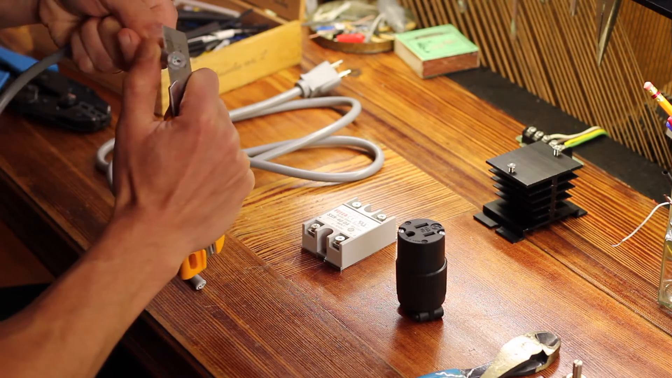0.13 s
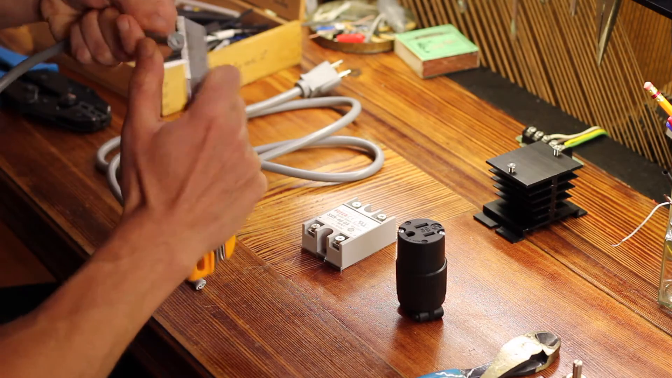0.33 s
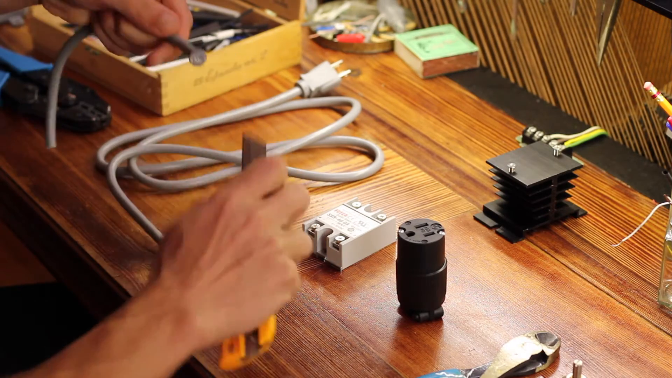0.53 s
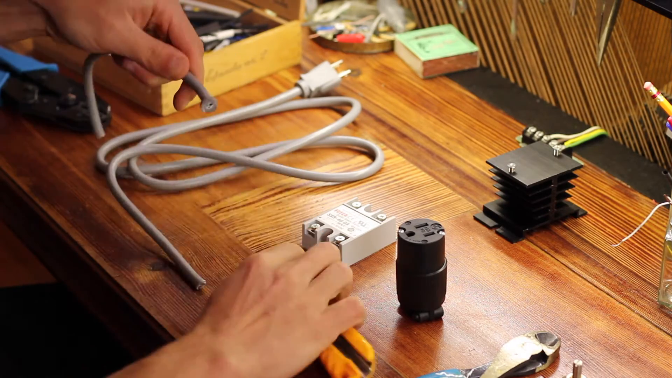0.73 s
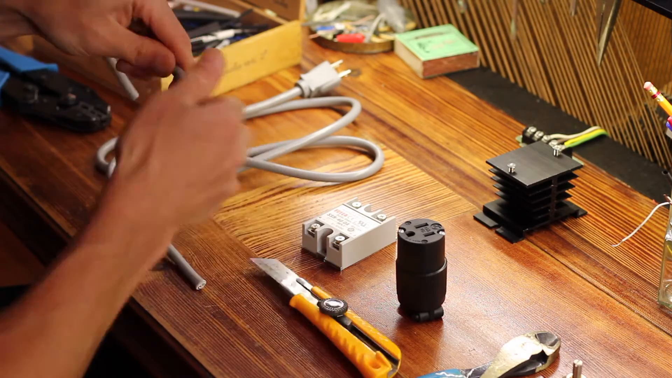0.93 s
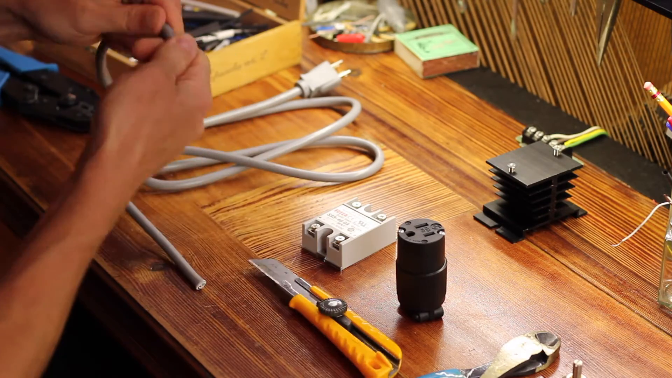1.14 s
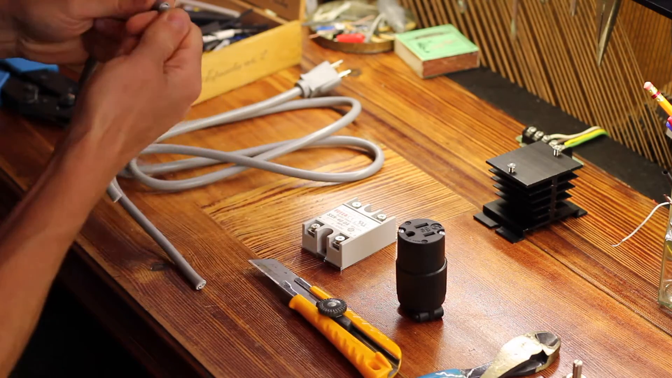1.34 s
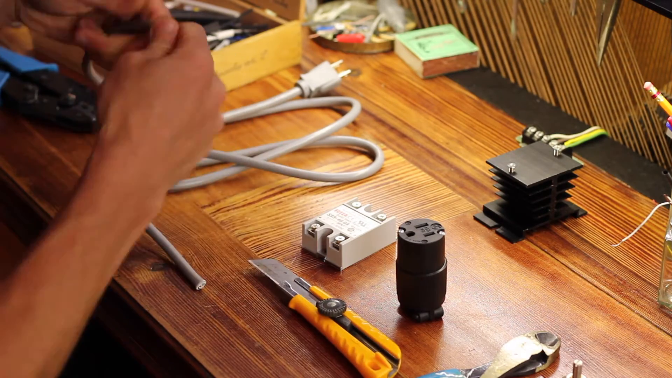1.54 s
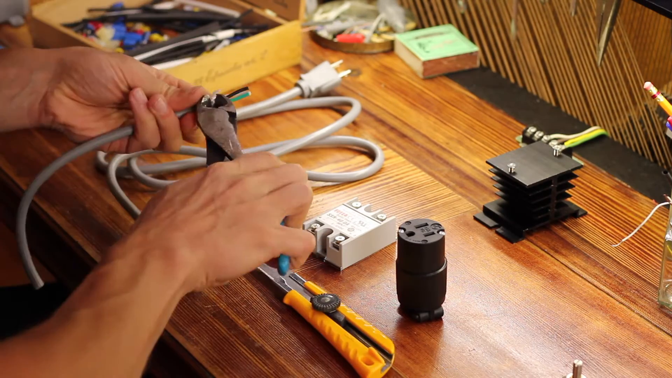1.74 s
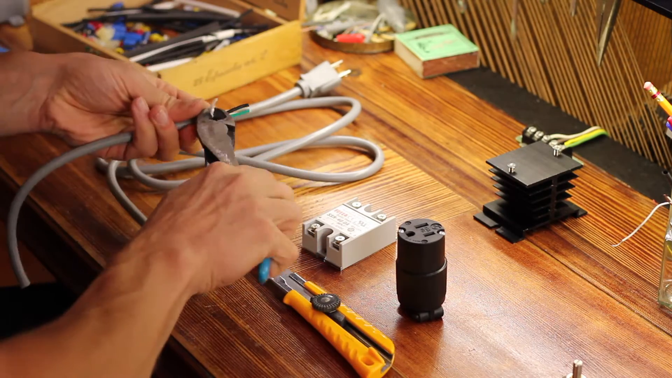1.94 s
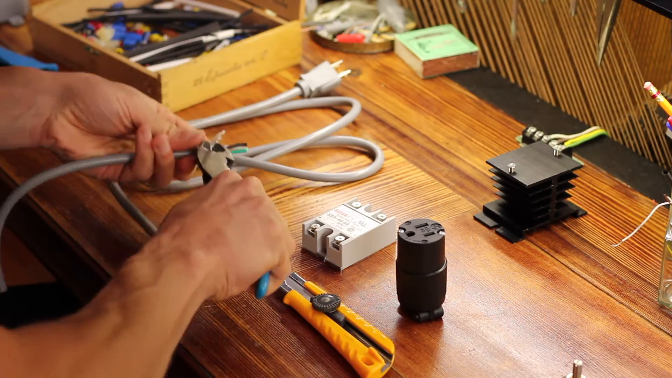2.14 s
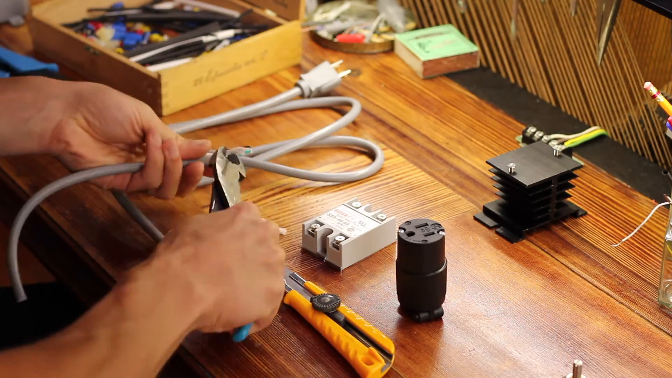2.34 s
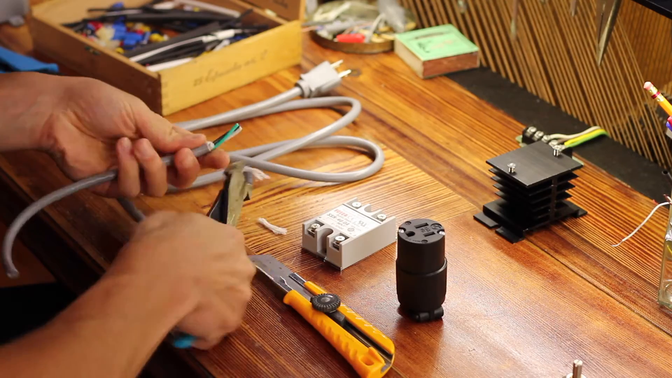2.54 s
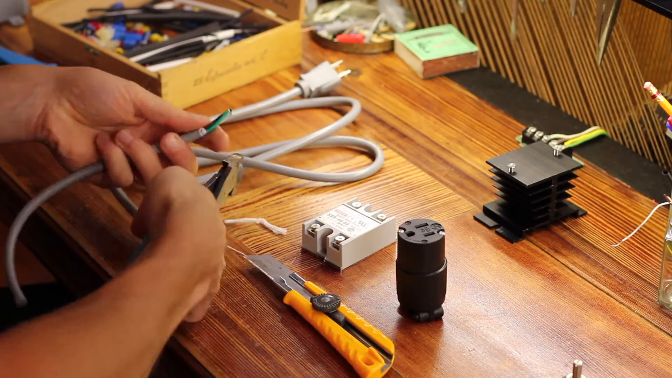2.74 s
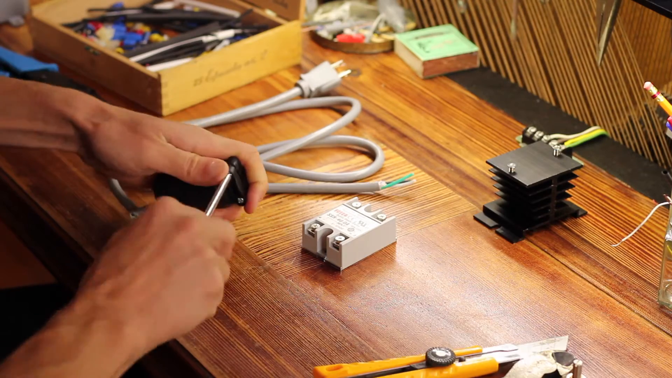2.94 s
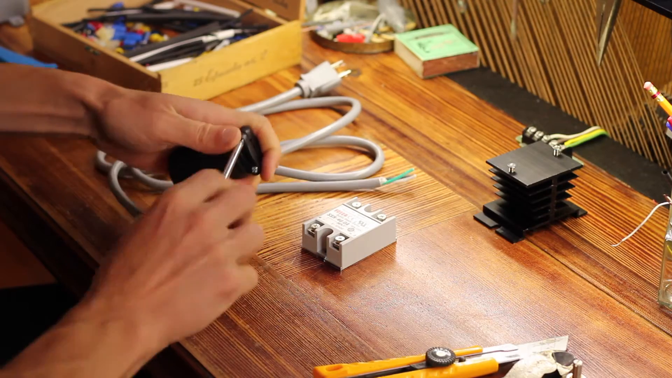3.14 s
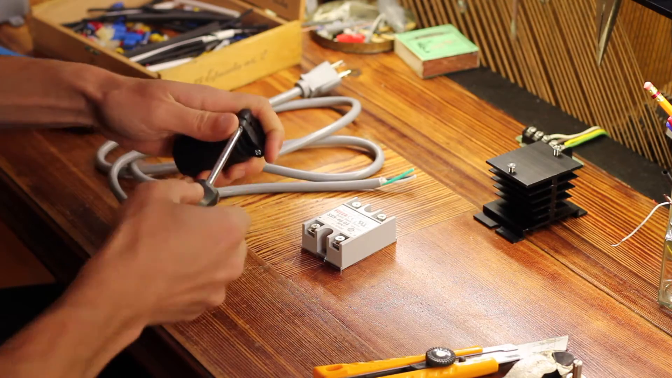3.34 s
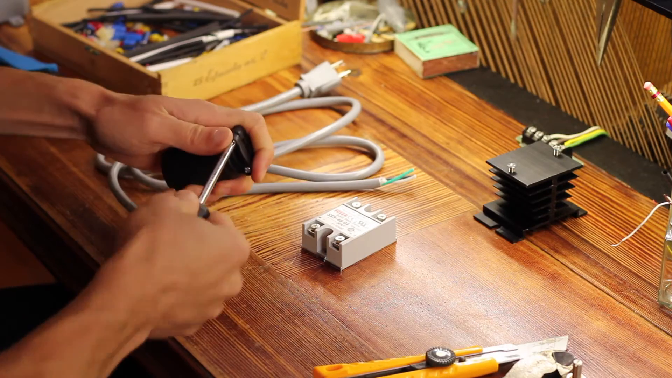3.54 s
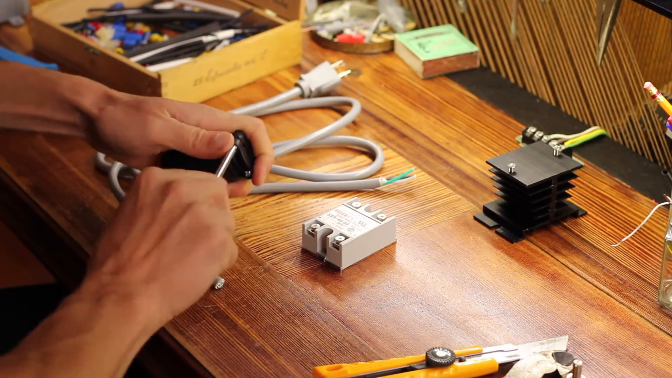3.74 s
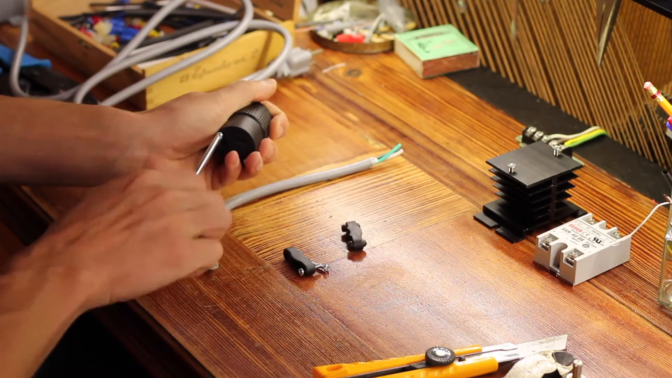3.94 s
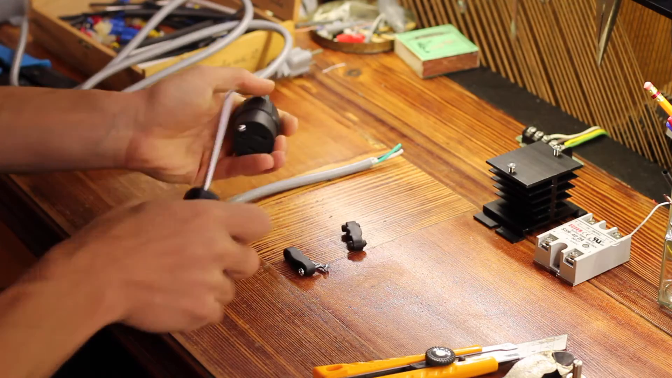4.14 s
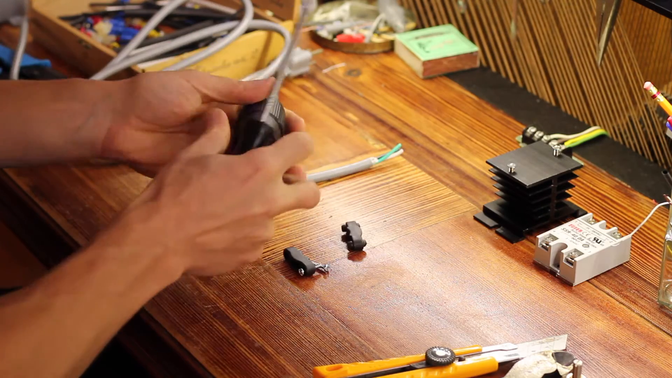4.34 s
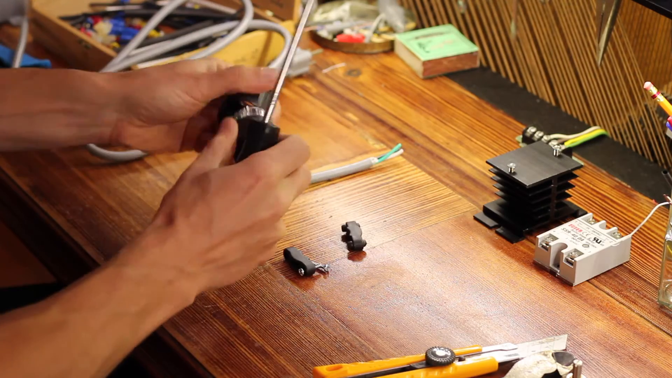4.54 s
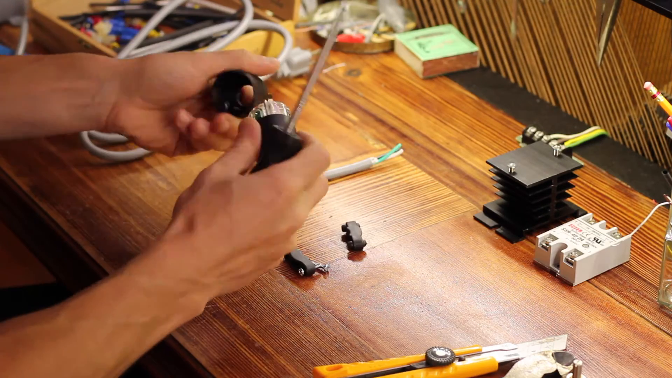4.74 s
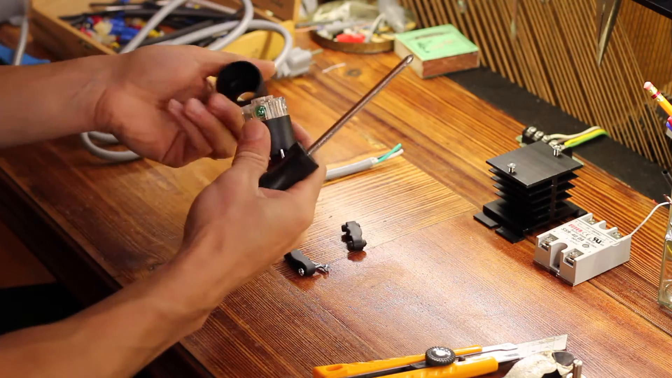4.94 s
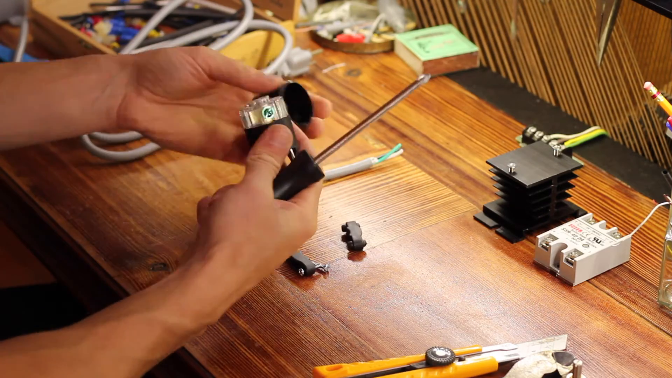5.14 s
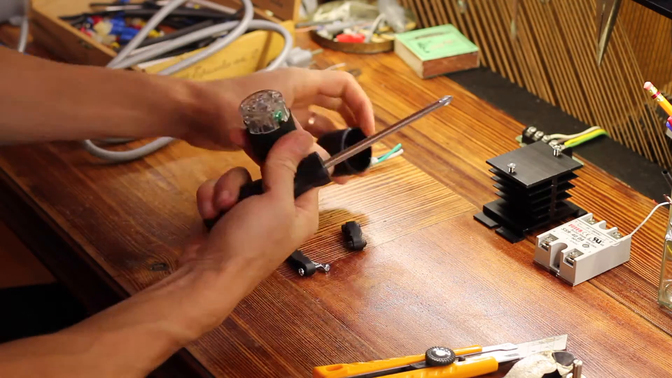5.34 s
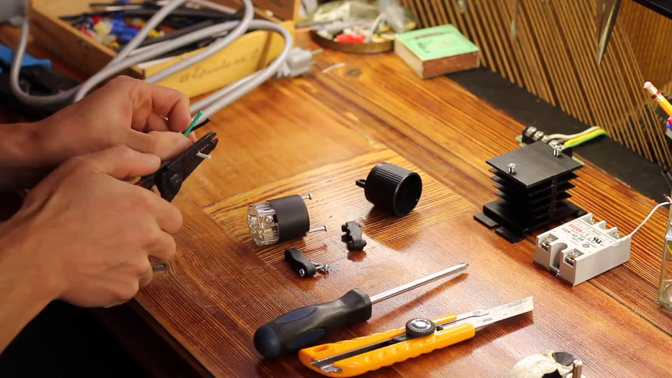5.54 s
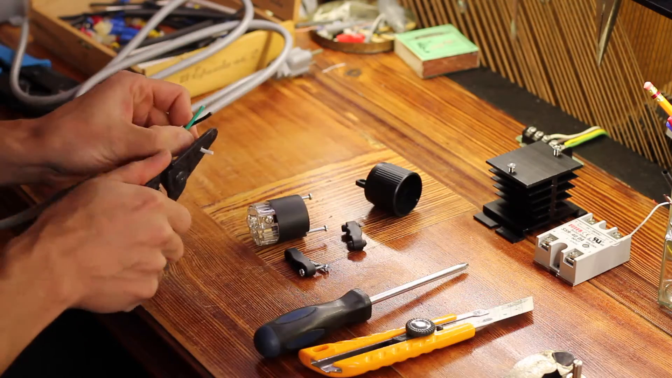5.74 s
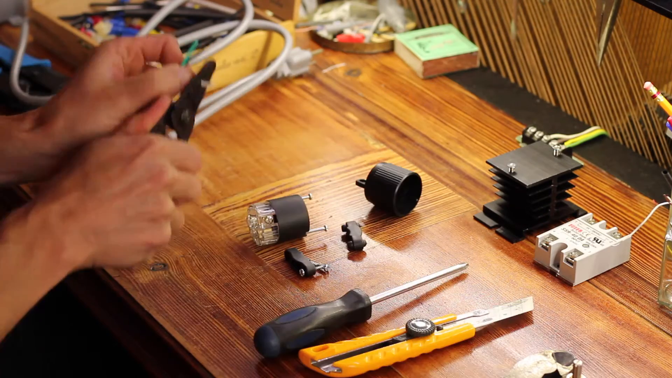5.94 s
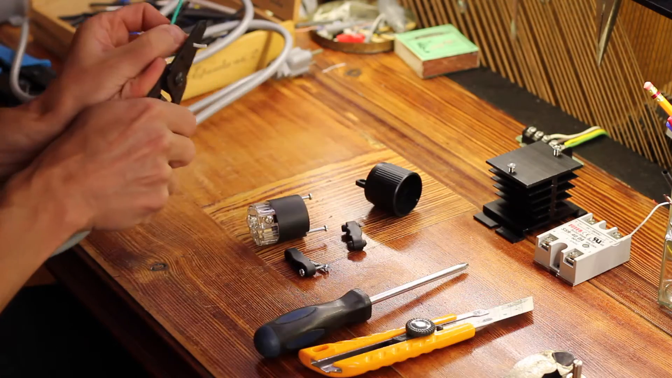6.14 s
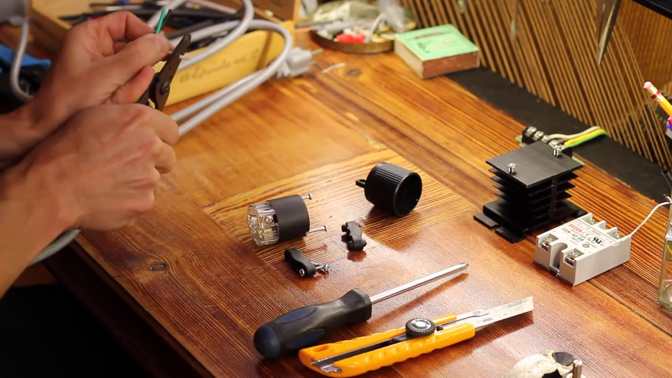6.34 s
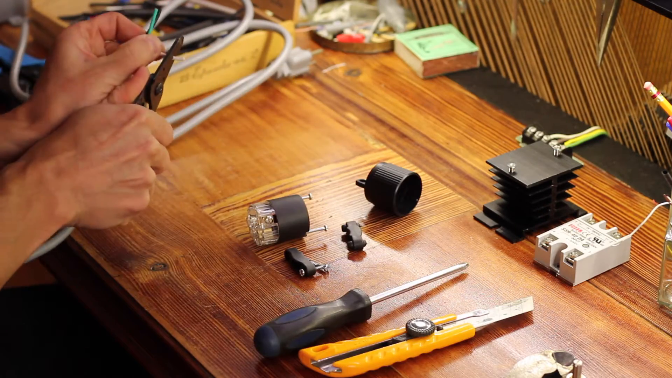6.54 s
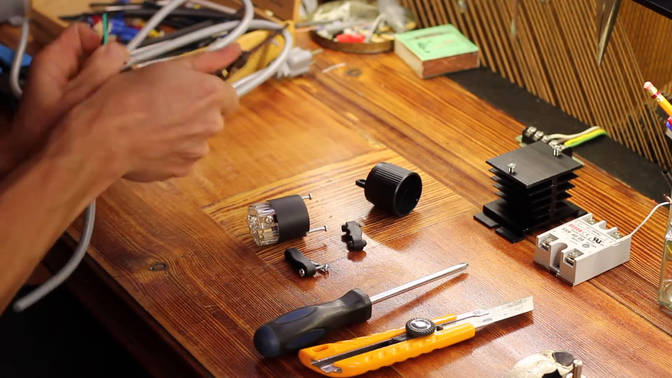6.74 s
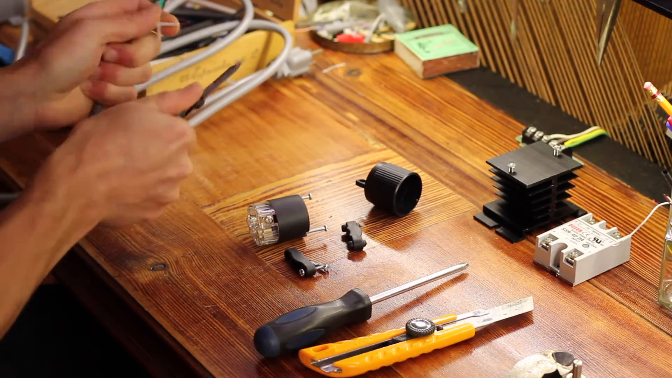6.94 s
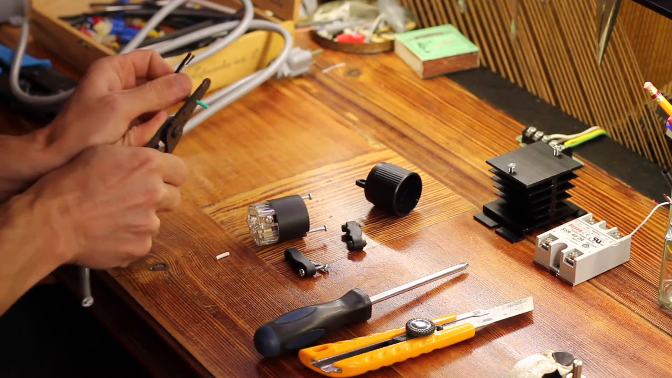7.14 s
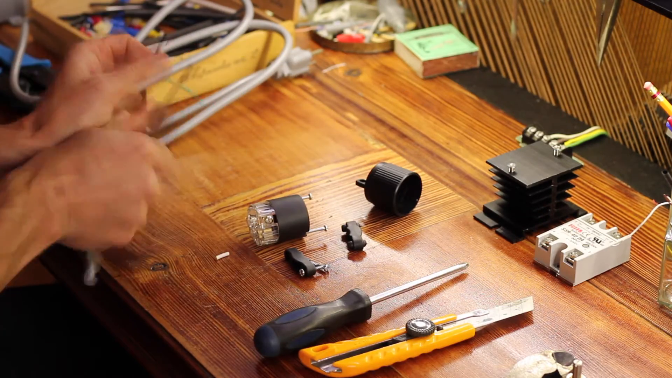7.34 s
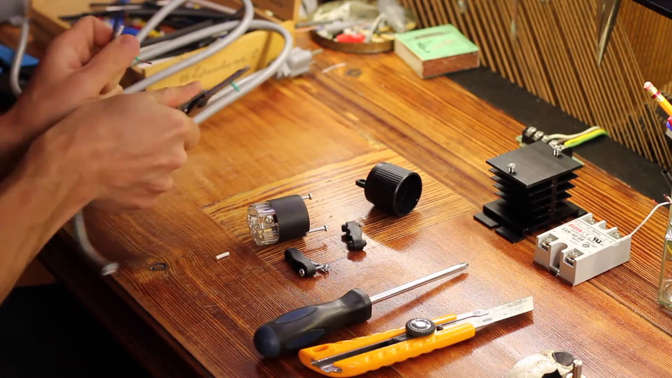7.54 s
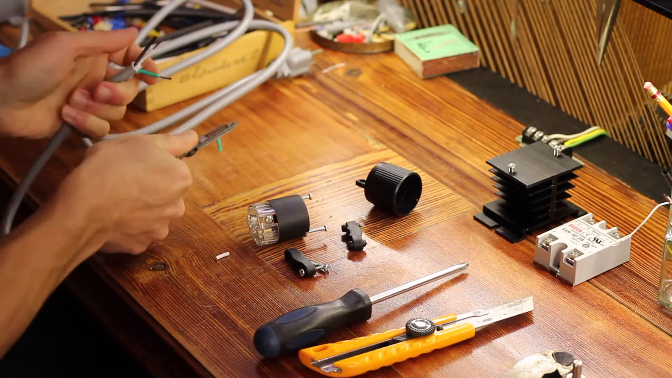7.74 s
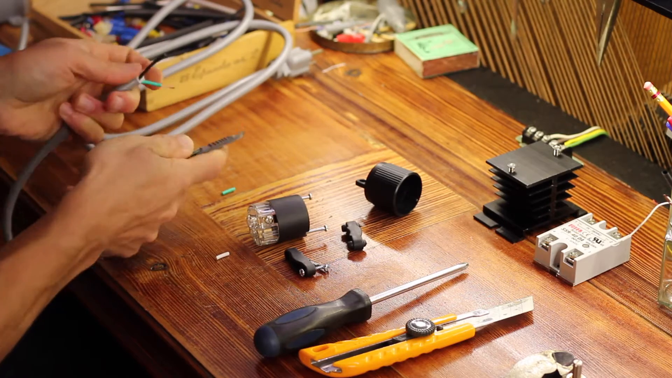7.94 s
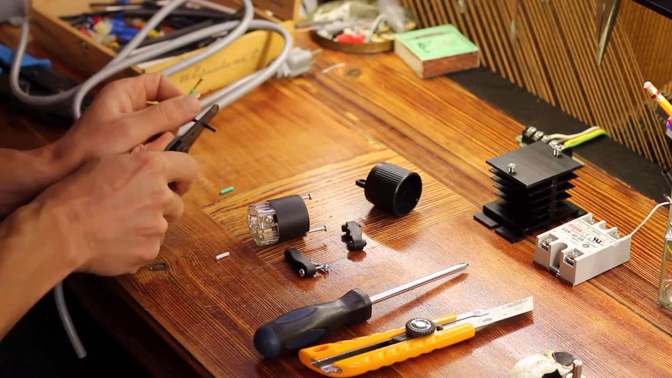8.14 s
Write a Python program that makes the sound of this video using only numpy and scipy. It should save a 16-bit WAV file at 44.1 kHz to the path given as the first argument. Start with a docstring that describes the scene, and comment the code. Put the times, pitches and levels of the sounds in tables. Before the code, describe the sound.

At a wooden bench, a knife clatters down, cutters crunch faintly through cable, plug parts knock and click, and wire strippers snap twice.

```python
"""A wooden bench in a small room: wiring work, heard close up and nearly mono.
A utility knife clicks and clatters down, side cutters crunch through a cable, a plug and tools are handled,
and wire strippers snap shut twice. Hits are noise bursts and short impulses through object resonances, with
diffuse room tails; the crunch is a dense run of random breaks. Shaped noise and thin tones lie under it all,
and the level dips briefly a few times."""
import sys
import numpy as np
from scipy import signal
from scipy.fft import rfft, irfft, next_fast_len
from scipy.io import wavfile
from scipy.ndimage import map_coordinates

SR = 44100
rng = np.random.default_rng(int(sys.argv[2]) if len(sys.argv) > 2 else 0)


def dump(signal):
    """Clip the signal to [-1, 1] and save it as 16-bit WAV at the path in sys.argv[1]."""
    limited = np.clip(np.atleast_2d(signal).T, -1, 1)
    pcm = np.round(limited * 32767).astype(np.int16)
    wavfile.write(sys.argv[1], SR, pcm)


N = 360738  # length in samples

# Knife clattering onto the bench: start_s, level_db, contact_s
KNIFE_KNOCKS = [(.742, -51.5, 0.033), (.748, -32.5, 0.13), (.764, -40.5, .06), (0.802, -31.5, 0.011),
                (.814, -26, 0.055), (0.823, -21.5, 0.099), (0.841, -21.5, .06), (.859, -23.5, 0.096),
                (0.879, -20, 0.092), (.905, -24, .06), (0.927, -23.5, 0.072), (0.946, -22, 0.063),
                (.988, -28, .06), (1.004, -25.5, 0.033), (1.062, -32.5, 0.048), (1.115, -39, .06)]
# Colour of the knocks on wood: freq_hz, gain_db
BENCH_COLOUR = [(40, -40.5), (80, -30), (175, -0.5), (280, -14), (410, 0.5), (520, 0), (700, 3.5),
                (1100, 2.5), (1700, -3), (2500, -8), (3700, -11.5), (4600, -23.5), (5400, -24),
                (8000, -32.5), (13000, -36.5), (16000, -49)]
# Ringing of the bench: centre_hz, width_hz, gain_db
BENCH_MODES = [(412, 8.8, 1.5), (883, 27, -4), (1125, 87, 2.5), (1632, 41, 5)]
# Shaking of the bench top: peak_s, level_db, rise_db_per_s, fall_db_per_s
BENCH_RUMBLE = (1.1146, -34.5, 131, 116)
SETTLE_S = 0.86  # from here the knife settles on its handle and every knock is duller
KNIFE_TREBLE_DB, DULLING_DB_PER_S = 9.5, 56
KNIFE_EDGE_HZ, EDGE_OCTAVES_PER_S = 20600, 16.4  # upper edge of a knock; how fast it sinks
KNIFE_BASS_DB, DEEPENING_DB_PER_S = 1, 18  # bass as it starts to settle; its growth

# Strippers snapping shut as the insulation gives:
# start_s, level_db, treble_db, room_db, thump_db, rustle_s
SNAPS = [(6.6514, -20.5, -30, -7.5, -27, .09), (7.4109, -14.5, -6, -9, -27, .13)]
# The snap and its quick echoes off the bench: delay_s, level_db
SNAP_ECHOES = [(0, 0), (.00205, -1), (.0036, 0.5), (.005, 1.5)]
# Colour of the snap: freq_hz, gain_db
STRIPPER_COLOUR = [(40, -25), (90, -11.5), (160, -2), (270, -12), (450, -7), (1250, 2.5), (2200, -6.5),
                   (3500, -3), (4300, -16.5), (6000, -22.5), (9000, -32.5), (12000, -31), (14000, -67.5)]
# Ringing of the strippers: pitch_hz, level_db, t60_s
STRIPPER_MODES = [(438, -13.5, 0.08), (507, -17, 0.22), (857, -13.5, 0.19), (1127, -8, 0.15),
                  (1280, -9, 0.068), (1855, -8, 0.069), (2480, -30, 0.14), (3260, -13, 0.19)]
# Jolt booming through bench and room: centre_hz, width_hz, gain_db
THUMP_MODES = [(82, 38, -14.5), (140.4, 11.2, -0.5), (180.2, 18, 1.5), (444, 40, -2)]
# Hollow rustle after each snap, at last in one band:
# delay (in rustle lengths), level_db (over the snap), centre_hz, width_hz, treble_share (of the snap's treble_db)
RUSTLE_BANDS = [(.04, -14.5, 2780, 2528, 0.89), (.07, -15, 890, 1296, 0), (.7, -20, 1200, 703.7, 0)]

# Resonances of the cutters, body and edge: centre_hz, width_hz, gain_db
CUTTER_BODY = [(1652, 47, 9.5), (1950, 210, 3), (2164, 236, 1.5)]
CUTTER_EDGE = [(4390, 430, 2.5), (6800, 610, 1.5), (7980, 470, 1), (11670, 3000, -13)]
CUT_S, CUT_DB = 2.130, -41  # the cutters enter the cable; body level of the full squeeze
CUT_ENTRY_DB, CUT_ATTACK_S, CUT_HOLD_S, CUT_FALL_DB_PER_S = -19.5, .023, .05, 213
EDGE_DB, EDGE_FADE_DB_PER_S, EDGE_LEAST_DB = 4, 130, -10  # edge tone over the body of the cutters

# Plug housing tapped and knocked: start_s, level_db, contact_s
PLUG_KNOCKS = [(2.686, -56.5, 0.033), (3.136, -25, 0.04), (3.151, -37, 0.017), (3.181, -27, 0.052)]
# Colour of the hollow housing: freq_hz, gain_db
HOUSING_COLOUR = [(60, -32), (450, -4.5), (780, 1.5), (1000, -2.5), (1250, 4.5), (1450, -3), (1650, 2.5),
                  (2100, -5), (2600, -6), (3050, -11), (3550, -8), (5000, -31), (7000, -49), (15000, -60)]

# Small clicks all list: start_s, level_db, contact_s, bass_db, treble_db
# Their resonances all list: centre_hz, width_octaves, gain_db
# Blade slider clicking into its notch
BLADE_CLICKS = [(.349, -40.5, 0.027, -3, 0.5)]
BLADE_RESONANCES = [(1560, 0.067, -3.5), (3040, 0.067, 1), (10100, 0.077, -29)]
# Cutters being picked up
HANDLE_CLICKS = [(1.551, -53, .025, 2, 2), (1.591, -57.5, 0.086, 0, -9)]
HANDLE_RESONANCES = [(3470, 0.071, 1.5), (5000, .08, -4), (8260, .45, -14)]
# Plug parts clicking and sliding apart
PART_CLICKS = [(3.063, -30.5, 0.022, -0.5, -2), (3.075, -43.5, 0.11, -16, -16.5), (4.526, -41, .006, -4, 7),
               (4.537, -39.5, 0.089, -9, -3), (4.562, -39, .03, -6, 7.5)]
PART_RESONANCES = [(1230, 0.16, -2.5), (2090, 0.15, -0.5), (3410, 0.12, 2.5), (4730, 0.49, -3.5),
                   (8500, .4, -12)]
# Screwdriver tip touching the screws
SCREW_CLICKS = [(4.085, -54.5, .016, 0, 10), (4.41, -47.5, 0.006, 0, -1.5), (5.733, -67.5, .014, 0, 7)]
SCREW_RESONANCES = [(5330, 0.038, 5), (7850, .1, -3.5), (9600, .1, -0.5), (11800, .08, -3)]
# Stripper jaws biting before each snap, and springing open
JAW_CLICKS = [(6.628, -32.5, 0.022, 11, -8), (7.382, -44, .015, 4, 0), (7.394, -40, 0.073, 6, -8),
              (7.857, -30.5, .02, -10.5, 4.5), (7.9, -48, 0.028, -8, -4), (7.945, -46.5, .025, -20, -3)]
JAW_RESONANCES = [(850, 0.49, -7), (2000, 0.43, -1.5), (3260, 0.28, 0), (8500, .4, -24)]
# Tiny ticks of metal tips: start_s, level_db, pitch_hz, width_octaves, contact_s, room_db
METAL_TICKS = [(2.106, -45.5, 7470, 0.039, 0.0076, -15), (3.038, -45, 3740, .22, 0.023, -6.5),
               (4.597, -54.5, 10400, .056, .048, -14), (8.124, -54, 3140, 0.026, .12, -6)]
CLICK_EDGE_HZ, CLICK_ONSET_S = 12200, 0.0011  # upper edge and soft onset of a click
EDGE_OCTAVES_PER_DB = .035  # brighter touches reach higher

# Fingers shifting on the cable: time_s, level_db
FINGER_RUB = [(.04, -80), (.08, -61), (.15, -60.5), (.24, -67), (.33, -70)]
# Colour of skin on the jacket: freq_hz, gain_db
SKIN_COLOUR = [(70, -23.5), (160, -5), (320, -12), (700, -22), (2500, -29.5), (4000, -25), (7000, -44),
               (16000, -50.5)]

# Colours of the room noise, low, middle and hiss: freq_hz, gain_db
LOW_COLOUR = [(25, -50), (55, -31), (85, -15), (118, -5), (165, -10), (210, -6), (280, 0), (450, -1),
              (540, -5), (630, -1), (760, -8), (1100, -15), (2000, -32), (4000, -60)]
MIDDLE_COLOUR = [(400, -39), (800, 4), (1200, -0.5), (1700, 2.5), (2600, -1), (3250, -2.5), (4000, -5.5),
                 (5500, -12.5), (9000, -33.5)]
HISS_COLOUR = [(25, -22), (70, -10), (200, 1), (600, 2), (2000, -1), (4500, 0), (9000, -2), (13000, -5),
               (16000, -8)]
LOW_DB, HISS_DB = -67, -72  # room noise at rest
# Middle of the room noise at rest: time_s, level_db
MIDDLE_LEVEL = [(0, -74), (3.8, -75), (3.9, -71.5), (7.05, -70.5), (7.15, -66.5)]
# Noise swelling after loud sounds, then sinking until the next dip: start_s, low_db, middle_db, hiss_db
NOISE_SWELLS = [(.9, -50, -61.5, -62.5), (2.15, -60.5, -70, -66), (3.1, -58.5, -66, -65),
                (4.53, -61.5, -68, -69), (6.63, -58, -61.5, -66), (7.41, -56.5, -55.5, -66),
                (7.86, -58.5, -56.5, -68.5)]
SWELL_RISE_S, SWELL_FALL_DB_PER_S = 0.043, 12
WHINE_DB = -82  # a thin tone at rest
# Whine coming forward: peak_s, level_db, rise_db_per_s, fall_db_per_s
WHINE_SWELLS = [(4.9, -68.5, 60, 38), (6.8, -77.5, 25, 15), (7.65, -61, 56, 42)]
# Decay of the room: freq_hz, t60_s
ROOM_DECAY = [(100, 0.21), (400, 0.34), (1200, 0.4), (2300, 0.22), (3500, 0.31), (6000, 0.2),
              (14000, 0.044)]
# Brief drops of the whole level: start_s
LEVEL_DIPS = [2.865, 3.833, 5.432, 7.101, 8.102]
TOP_HZ = 15800  # band limit


def knife(room_db=-4, bass_hz=450, treble_hz=3800, ring_db=-3, edge_db=20, sheen_db=8, sheen_hz=9000):
    """The knife rattles to rest, ever deeper and at last duller, and sets the bench top ringing and rumbling."""
    knocks = np.zeros(N)
    for start_s, level_db, contact_s in KNIFE_KNOCKS:
        settled_s = max(start_s - SETTLE_S, 0)
        bass_db = KNIFE_BASS_DB + DEEPENING_DB_PER_S * (start_s - SETTLE_S)
        treble_db = KNIFE_TREBLE_DB - DULLING_DB_PER_S * settled_s
        edge_hz = KNIFE_EDGE_HZ * 2 ** (-EDGE_OCTAVES_PER_S * settled_s)

        def colour_db(hz):
            wood = along(BENCH_COLOUR, hz)
            tilt = bass_db * (1 - above(hz, bass_hz)) + treble_db * above(hz, treble_hz)
            top = sheen_db * above(hz, sheen_hz) - edge_db * above(hz, edge_hz)
            return wood + tilt + top + 3 * ripple(hz) * above(hz, 1500)

        knock = blow(coloured(contact(contact_s), colour_db))
        add(knocks, start_s, amp(level_db) * in_room(knock, room_db))
    ring = sum(resonant(knocks, [mode]) for mode in BENCH_MODES)
    rumble = swell(*BENCH_RUMBLE) * noise(LOW_COLOUR)
    return knocks + amp(ring_db) * ring + rumble


def strippers(rattle_db=-7, rattle_s=0.025, ring_db=-8, treble_hz=5800, thump_s=.12):
    """The jaws slam shut, echo off the bench, rattle and ring briefly; the jolt leaves a low thump."""
    out, t = np.zeros(N), np.arange(SR // 2) / SR
    for start_s, level_db, treble_db, room_db, thump_db, _ in SNAPS:
        impulses = np.zeros(len(t))
        for delay_s, echo_db in SNAP_ECHOES:
            impulses[round(abs(delay_s) * SR)] -= amp(echo_db)
        rattle = amp(rattle_db) * contact(rattle_s)
        crack = blow(coloured(blow(impulses) + rattle, lambda hz: along(STRIPPER_COLOUR, hz)))
        ring = np.zeros(len(t))
        for pitch_hz, mode_db, t60_s in STRIPPER_MODES:
            varied_db = mode_db + rng.normal(0, 4.8)  # each snap excites the modes differently
            ring += amp(varied_db - 60 * t / t60_s) * np.sin(2 * np.pi * pitch_hz * t)
        snap = coloured(crack + amp(ring_db) * blow(ring), lambda hz: treble_db * above(hz, treble_hz))
        add(out, start_s, amp(level_db) * in_room(blow(snap), room_db))
        jolt = contact(thump_s) * (1 - np.exp(-t / 0.0045))  # soft onset
        add(out, start_s, amp(thump_db) * blow(resonant(jolt, THUMP_MODES)))
    return out


def snap_rustle(top_hz=4600):
    """A hollow rustle of banded noise swells and fades as each snap dies away."""
    out = np.zeros(N)
    for start_s, snap_db, treble_db, _, _, rustle_s in SNAPS:
        shape = np.hanning(round(rustle_s * SR))
        for delay, level_db, centre_hz, width_hz, treble_share in RUSTLE_BANDS:
            band = [(centre_hz, width_hz, 0)]
            # twice through the band for steeper sides
            rustle = resonant(resonant(rng.standard_normal(len(shape)), band), band)
            rustle = filtered(rustle, lambda hz: 1 - above(hz ** 2, top_hz ** 2))
            gain = amp(snap_db + level_db + treble_share * treble_db)
            add(out, start_s + delay * rustle_s, gain * blow(shape * rustle))
    return out


def cutters(fibres_per_s=2500, room_db=-10):
    """The jacket tears in many tiny breaks that sound through the cutters; the edge tone fades as they sink in."""
    t = np.maximum(np.arange(N) / SR - CUT_S, 0)
    entry_db = CUT_ENTRY_DB * np.maximum(1 - t / CUT_ATTACK_S, 0)
    fall_db = CUT_FALL_DB_PER_S * np.maximum(t - CUT_ATTACK_S - CUT_HOLD_S, 0)
    squeeze = amp(CUT_DB + entry_db - fall_db) * (t > 0)
    edge_db = np.maximum(EDGE_DB - EDGE_FADE_DB_PER_S * t, EDGE_LEAST_DB)
    breaks = (rng.random(N) < fibres_per_s / SR) * rng.standard_normal(N)
    breaks += 0.13 * rng.standard_normal(N)  # fine grain between the breaks
    body = unit(resonant(breaks, CUTTER_BODY))
    edge = amp(edge_db) * unit(resonant(breaks, CUTTER_EDGE))
    return in_room(squeeze * (body + edge), room_db)


def plug(room_db=-5):
    """The hollow housing knocks and bounces, each contact coloured by its shell."""
    out = np.zeros(N)
    for start_s, level_db, contact_s in PLUG_KNOCKS:
        knock = blow(coloured(contact(contact_s), lambda hz: along(HOUSING_COLOUR, hz)))
        add(out, start_s, amp(level_db) * in_room(knock, room_db))
    return out


def handling():
    """Knife blade, cutter handles, plug parts, screws and stripper jaws click in the hands."""
    knife_and_cutters = (clicks(BLADE_CLICKS, BLADE_RESONANCES, room_db=-14.5)
                         + clicks(HANDLE_CLICKS, HANDLE_RESONANCES, room_db=0))
    plug_work = (clicks(PART_CLICKS, PART_RESONANCES, room_db=-6)
                 + clicks(SCREW_CLICKS, SCREW_RESONANCES, room_db=-13))
    return knife_and_cutters + plug_work + clicks(JAW_CLICKS, JAW_RESONANCES, room_db=-4.5)


def clicks(rows, resonances, room_db):
    """One object is touched at several moments; each touch has its own strength and brightness."""
    out = np.zeros(N)
    for start_s, level_db, contact_s, bass_db, treble_db in rows:
        click = light_contact(resonances, contact_s, room_db, bass_db, treble_db)
        add(out, start_s, amp(level_db) * click)
    return out


def ticks(pan_db=-1.5):
    """Each tiny metal part ticks at one pitch, a little to the right."""
    out = np.zeros(N)
    for start_s, level_db, pitch_hz, width_octaves, contact_s, room_db in METAL_TICKS:
        tick = light_contact([(pitch_hz, width_octaves, 0)], contact_s, room_db)
        add(out, start_s, amp(level_db) * tick)
    return out * amp([[pan_db / 2], [-pan_db / 2]])


def light_contact(resonances, contact_s, room_db, bass_db=0, treble_db=0,
                  bass_hz=1400, treble_hz=6000, edge_db=22, ripple_db=3.0):
    """A small part answers a short contact with its cluster of resonances."""
    edge_hz = CLICK_EDGE_HZ * 2 ** (EDGE_OCTAVES_PER_DB * treble_db)

    def colour_db(hz):
        power = 0
        for centre_hz, width_octaves, gain_db in resonances:
            distance = np.log2((hz + 1) / centre_hz) / width_octaves
            power = power + (amp(gain_db) / (1 + distance ** 2 / 2)) ** 2
        tilt = bass_db * (1 - above(hz, bass_hz)) + treble_db * above(hz, treble_hz)
        edge = edge_db * above(hz ** 2, edge_hz ** 2)  # squared: a steeper step
        return 10 * np.log10(power) + tilt - edge + ripple_db * ripple(hz)

    soft_onset = 1 - np.exp(-np.arange(SR // 2) / SR / CLICK_ONSET_S)
    return in_room(blow(coloured(contact(contact_s) * soft_onset, colour_db)), room_db)


def fingers():
    """Skin slides softly over the cable jacket: shaped noise under a drawn level."""
    touching = np.arange(N) / SR < FINGER_RUB[-1][0]
    return touching * amp(curves(FINGER_RUB)[0]) * noise(SKIN_COLOUR)


def room_noise(hum_hz=119, hum_db=-79, whine_hz=1200, buzz_hz=3200, buzz_db=-9):
    """Low rumble, hum, faint drone, high buzz and thin whine in the middle; each channel has its own hiss."""
    low, middle, hiss = noise_gains()
    buzz = amp(buzz_db) * narrow(buzz_hz, 150)
    air = low * noise(LOW_COLOUR) + middle * (noise(MIDDLE_COLOUR) + buzz)
    hum = amp(hum_db) * narrow(hum_hz, 6.4)
    drone = amp(-75) * narrow(638, 12)
    steady = np.sqrt(2) * np.sin(2 * np.pi * whine_hz * np.arange(N) / SR)
    whine_gain = amp(WHINE_DB) + sum(swell(*row) for row in WHINE_SWELLS)
    whine = whine_gain * unit(steady + narrow(whine_hz, 11) / 2)
    return air + drone + whine + hum + hiss * np.array([noise(HISS_COLOUR), noise(HISS_COLOUR)])


def noise_gains():
    """Gains of low, middle and hiss: resting power plus listed swells, each cut off at the next dip."""
    t = np.arange(N) / SR
    power = amp(np.broadcast_arrays(LOW_DB, curves(MIDDLE_LEVEL)[0], HISS_DB)) ** 2
    for start_s, *levels_db in NOISE_SWELLS:
        age = np.maximum(t - start_s, 0)
        next_dip_s = min(dip_s for dip_s in LEVEL_DIPS if dip_s > start_s)
        rise = 1 - np.exp(-age / SWELL_RISE_S)
        shape = rise * amp(-SWELL_FALL_DB_PER_S * age) * (t < next_dip_s)
        power = power + np.outer(amp(levels_db), shape) ** 2
    return np.sqrt(power)


def contact(length_s):
    """A dying burst of micro-impacts with an even spectrum, in a half-second buffer."""
    t = np.arange(SR // 2) / SR
    fade = amp(-30 * t / length_s)
    spectrum = rfft(rng.standard_normal(len(t)) * fade)
    even = irfft(spectrum / np.abs(spectrum), len(t))
    return blow(even * np.sqrt(fade))


def in_room(x, room_db, build_s=0.0032):
    """A sound plus its own diffuse tail of noise, each frequency dying at its own rate."""
    hz, t, z = signal.stft(rng.standard_normal(SR // 2), SR, nperseg=256)
    decay = amp(-60 * t / along(ROOM_DECAY, hz)[:, None])
    tail = signal.istft(z * decay, SR, nperseg=256)[1]
    tail *= 1 - np.exp(-(np.arange(len(tail)) / SR / build_s) ** 2)
    # room_db 0 gives the tail a fifth of unit energy below SR / 10
    middle = filtered(tail, lambda hz: hz < SR / 10)
    tail = tail / np.linalg.norm(middle) / np.sqrt(5)
    return x + amp(room_db) * signal.fftconvolve(x, tail)[:len(x)]


def resonant(x, peaks):
    """x through a few (centre_hz, width_hz, gain_db) resonances of alternating sign."""
    def response(f):
        total = 0
        for k, (centre, width, gain_db) in enumerate(peaks):
            peak = 1j * f * width / (centre * centre - f * f + 1j * f * width)
            total = total + (-1) ** k * amp(gain_db) * peak
        return total

    return filtered(x, response)


def ripple(hz, spacing_hz=260):
    """Every contact point favours other resonances: a random curve over frequency from unit-variance points."""
    return map_coordinates(rng.standard_normal(256), [hz / spacing_hz], mode="mirror")


def noise(spectrum):
    """Noise of rms 1 with a (freq_hz, gain_db) spectrum."""
    return unit(filtered(rng.standard_normal(N), lambda hz: amp(along(spectrum, hz))))


def narrow(centre_hz, width_hz):
    """A wavering tone of rms 1, from narrow-band noise."""
    return unit(filtered(rng.standard_normal(N), lambda hz: 1 / (1 + ((hz - centre_hz) / width_hz) ** 2)))


def swell(peak_s, level_db, rise, fall):
    """A gain that climbs to a peak and sinks again, at steady dB per second."""
    t = np.arange(N) / SR - peak_s
    return amp(level_db - np.maximum(-t * abs(rise), t * abs(fall)))


def coloured(x, gain_db, size=4096):
    """x through a causal minimum-phase filter with the given dB over frequency."""
    cepstrum = irfft(np.log(amp(gain_db(np.fft.rfftfreq(size, 1 / SR))) + 1e-6))
    # folding the cepstrum forward makes the filter causal
    cepstrum[1:size // 2] *= 2
    cepstrum[size // 2 + 1:] = 0
    return signal.fftconvolve(x, irfft(np.exp(rfft(cepstrum))))[:len(x)]


def filtered(x, response):
    """x times a response of frequency."""
    n = x.shape[-1]
    m = next_fast_len(n + SR // 4)
    return irfft(rfft(x, m) * response(np.fft.rfftfreq(m, 1 / SR)), m)[..., :n]


def above(hz, corner_hz):
    """A smooth step from 0 to 1 around a corner."""
    return hz ** 4 / (hz ** 4 + corner_hz ** 4)


def along(points, hz):
    """(freq_hz, value) points joined on a log frequency axis."""
    f, v = np.transpose(points)
    return np.interp(np.log(hz + 1), np.log(f), v)


def curves(rows):
    """One value per sample for each column after the time."""
    s, *cols = np.transpose(rows)
    return [np.interp(np.arange(N) / SR, s, c) for c in cols]


def amp(db):
    """Decibels to amplitude."""
    return 10 ** (np.asarray(db) / 20)


def unit(x):
    """Scale to rms 1."""
    return x / np.sqrt(np.mean(x ** 2) + 1e-20)


def blow(x):
    """Scale a hit so that its energy equals rms 1 for 10 ms."""
    return x / np.linalg.norm(x) * np.sqrt(SR / 100)


def add(track, start_s, x):
    """Mix x into the track at a time."""
    part = track[..., round(start_s * SR):][..., :x.shape[-1]]
    part += x[..., :part.shape[-1]]


def spread(x, side_db, delay_s=.003):
    """A faint early reflection has opposite sign in the two channels."""
    side = amp(side_db) * filtered(x, lambda hz: np.exp(-2j * np.pi * hz * delay_s))
    return np.array([x + side, x - side])


def scene():
    """The work sits in the middle; the small clicks are a little wider and the ticks a little to the right."""
    work = knife() + strippers() + snap_rustle() + cutters() + plug() + fingers()
    return work + spread(handling(), side_db=-22) + ticks() + room_noise()


def record(dry, dip_db=-23, hold_s=0.0068, recovery_s=0.042):
    """The level dips briefly a few times; nothing is kept above the band limit."""
    t = np.arange(N) / SR
    gain_db = np.zeros(N)
    for start_s in LEVEL_DIPS:
        corners_s = [-.001, 0, hold_s, hold_s + recovery_s]
        gain_db += np.interp(t - start_s, corners_s, [0, dip_db, dip_db, 0])
    return filtered(dry * amp(gain_db), lambda hz: hz < TOP_HZ)


dry = scene()
out = record(dry)
dump(out)
```